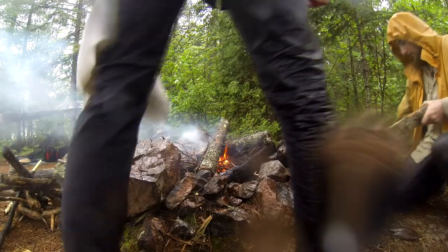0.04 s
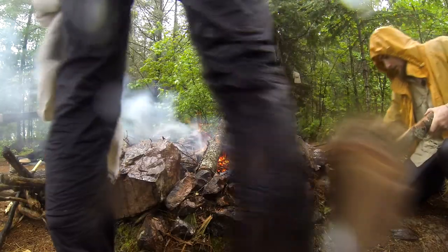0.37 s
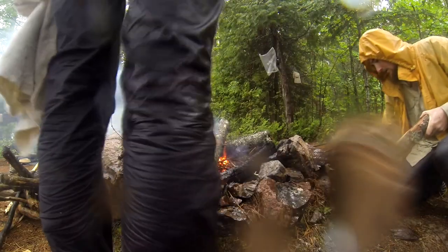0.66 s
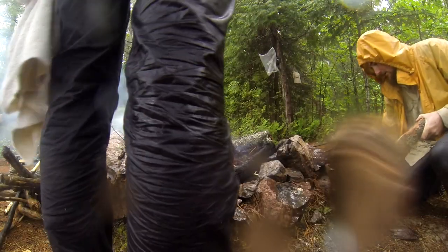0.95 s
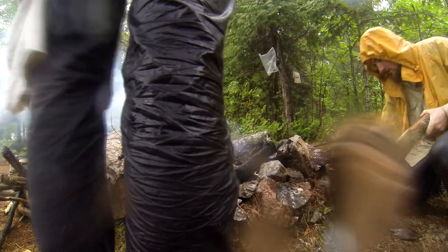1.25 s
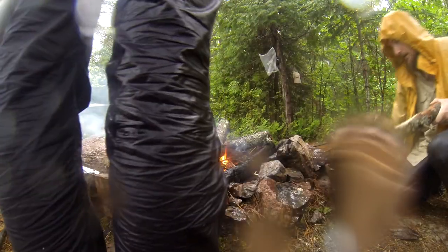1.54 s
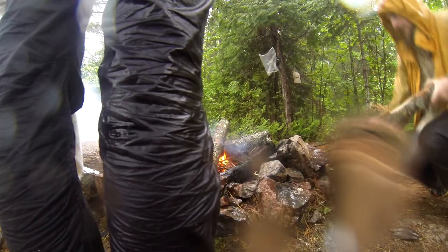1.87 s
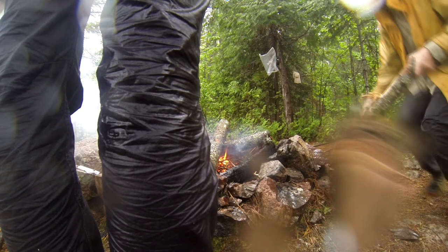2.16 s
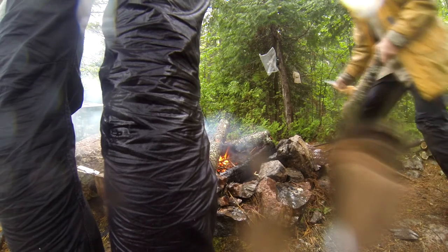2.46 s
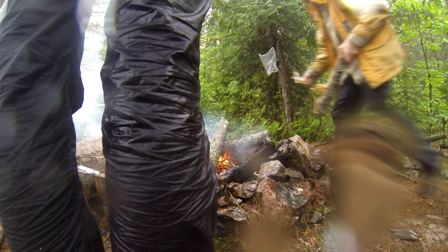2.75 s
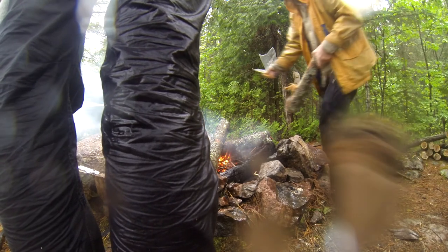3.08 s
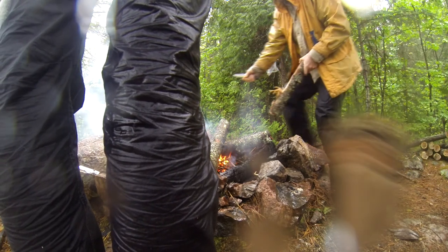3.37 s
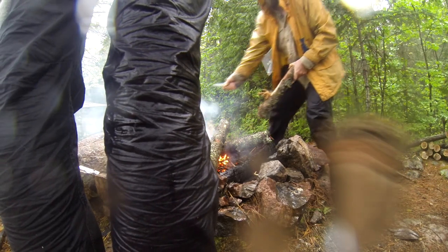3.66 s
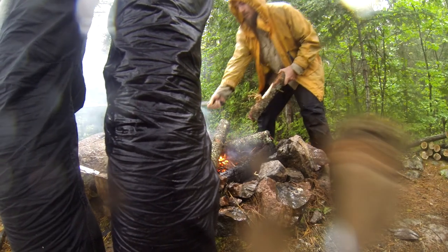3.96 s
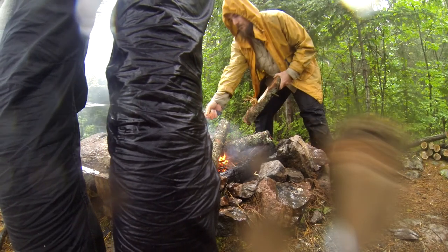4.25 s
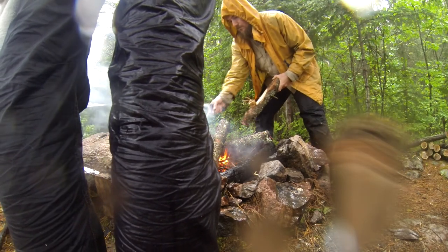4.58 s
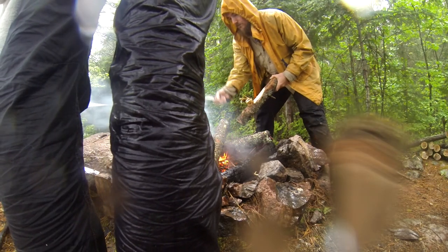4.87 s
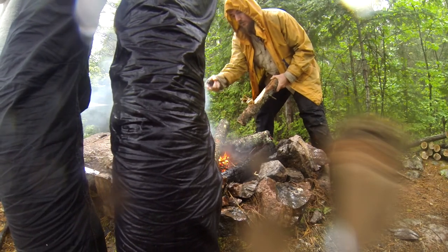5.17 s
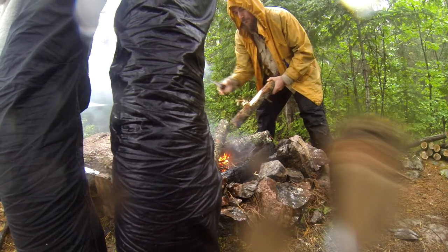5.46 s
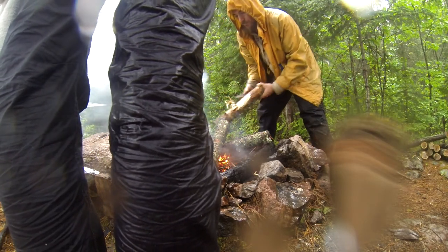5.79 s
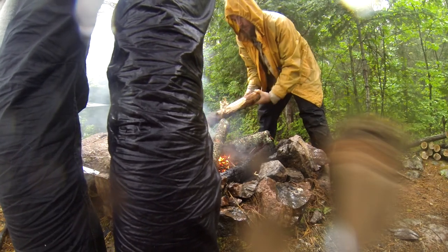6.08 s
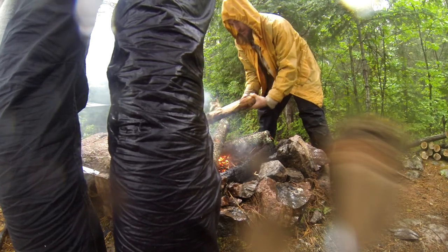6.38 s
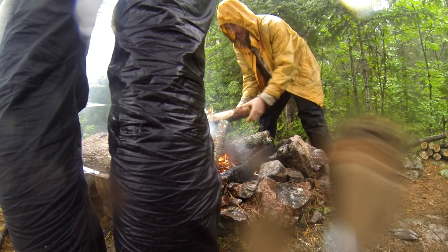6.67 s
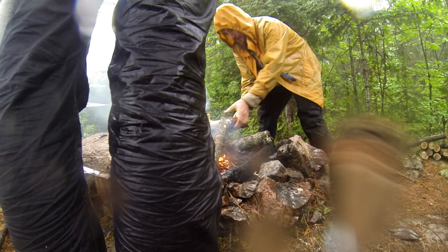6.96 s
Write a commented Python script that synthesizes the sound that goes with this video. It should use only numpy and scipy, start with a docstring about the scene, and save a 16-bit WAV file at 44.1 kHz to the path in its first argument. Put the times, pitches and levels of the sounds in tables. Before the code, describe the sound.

Single raindrops tick on a waterproof plastic camera housing at a forest campsite, heard by the microphone inside it. The taps are short and irregular, a few sharp and loud, many small, some with a tiny spit of spray. Dull knocks jolt the case, mostly in the first half. Later comes a quick run of lighter ticks. Behind them lie a faint, muffled rain hush and a barely audible electronic whine.

```python
"""Single raindrops tick on plastic, heard from inside a waterproof camera housing at a campsite.
Each impact excites the housing's damped modes in its own mix and bursts into a spit of spray.
Dull knocks jolt the case, and a nearby footfall and the heaviest drop set the mount swaying.
Behind them are faint droplets, a hush of rain muffled by the shell, and the thin whine of
the camera's electronics."""
import sys
import numpy as np
from scipy import signal
from scipy.fft import rfft, irfft, next_fast_len
from scipy.io import wavfile
from scipy.ndimage import map_coordinates

SR = 44100
rng = np.random.default_rng(int(sys.argv[2]) if len(sys.argv) > 2 else 0)


def waveform_to_disk(signal):
    """Save audio, clipped to [-1, 1], as 16-bit WAV at the path in sys.argv[1]."""
    frames = np.transpose(np.atleast_2d(signal))
    scaled = np.clip(frames, -1, 1) * 32767
    samples = np.round(scaled).astype(np.int16)
    wavfile.write(sys.argv[1], SR, samples)


N = 314433

# Normal modes, from the mount and the whole case on it up to the stiff rim:
# pitch_hz, relative_db, t60_s
MOUNT_MODES = [(99, -4.5, 0.025), (210, -8, 0.04)]
CASE_MODES = [(375, 0, 0.086)]
SHELL_MODES = [(1325, -0.5, 0.015), (1377, -5.5, 0.016), (1519, 1, 0.012), (1662, -4.5, 0.017)]
WALL_MODES = [(2080, -1, 0.013), (2420, -2.5, .012), (2807, -2, 0.013), (3050, -7, 0.015),
              (3283, -0.5, 0.013), (3550, 0.5, 0.0085), (3920, -0.5, 0.0096)]
RIM_MODES = [(4680, -5, 0.0079), (5186, -3.5, 0.0095), (5610, -9, 0.0093), (6560, -8.5, 0.0046),
             (6920, -7.5, 0.0029), (7500, -7.5, 0.004)]


def amp(db):
    """Decibels to amplitude ratio."""
    return 10 ** (np.asarray(db) / 20)


def add(track, start_s, x):
    """Superposition: x sums into the track from start_s on."""
    i = int(np.clip(round(start_s * SR), 0, N))
    track[i:i + len(x)] += x[:N - i]


def wobble(rate_hz):
    """Slow random modulation: a spline through rate_hz knots a second."""
    knots = rng.standard_normal(int(N * rate_hz / SR) + 4)
    return map_coordinates(knots, [np.arange(N) * rate_hz / SR])


def filtered(x, response):
    """Linear filtering: the spectrum of x times a frequency response."""
    size = next_fast_len(N + SR // 2)
    return irfft(rfft(x, size) * response(np.fft.rfftfreq(size, 1 / SR)), size)[:N]


def ring(modes, attack_s, centre_hz=None, reach_octaves=0.14, edge_ratio=0.53, order=4):
    """Modal superposition: a blow excites damped sines, favouring those near centre_hz. Energy 1."""
    t = np.arange(SR // 12) / SR
    hz, db, t60_s = np.transpose(modes)[:, :, None]
    scatter, detune = rng.standard_normal((2, len(modes), 1))
    db = db + 3.0 * scatter
    if centre_hz:
        db = db - 6 * np.abs(np.log2(hz / centre_hz)) / reach_octaves
    polarity = rng.choice([-1, 1], hz.shape)  # in or out, depending on the spot struck
    swing = polarity * np.sin(2 * np.pi * hz * (1 + 0.016 * detune) * t)
    # Wet plastic damps fast, leaving only a faint after-ring.
    decay = amp(-60 * t / t60_s) + amp(-42 - 60 * t / 0.068)
    onset = 1 - np.exp(-t / attack_s)
    x = np.sum(swing * amp(db) * decay, axis=0) * onset
    # Little is radiated below the modes that are struck.
    edge_hz = edge_ratio * (centre_hz or hz.min())
    x = signal.sosfilt(signal.butter(order, edge_hz, "high", fs=SR, output="sos"), x)
    return x / np.linalg.norm(x)


def splash(t60_s=0.0067, band_hz=(6500, 13500)):
    """Broadband transient: bursting water spits bright, fast-decaying noise. Energy 1."""
    t = np.arange(SR // 40) / SR
    burst = rng.standard_normal(len(t)) * amp(-60 * t / t60_s)
    x = signal.sosfilt(signal.butter(2, band_hz, "band", fs=SR, output="sos"), burst)
    return x / np.linalg.norm(x)


def electronics_whine():
    """Phase modulation: the thin, steady tones of the electronics waver slightly."""
    # Tones of the electronics: pitch_hz, rms_db
    tones = [(10645, -88), (13187, -96)]
    t = np.arange(N) / SR
    return sum(np.sqrt(2) * amp(db) * np.sin(2 * np.pi * hz * t + 0.5 * wobble(12)) for hz, db in tones)


def rain_hush(level_db=-59.0):
    """Transmission loss and resonance: the housing dulls and colours the noise of the rain outside."""
    # Spectral density of the hush inside: frequency_hz, relative_db
    spectrum = [(15, -2), (38, 1.5), (90, -5.5), (180, -10.5), (300, -14), (600, -18), (1080, -21.5),
                (1850, -18.5), (3400, -23), (4300, -26), (6200, -31.5), (9500, -36), (14500, -42)]
    # Resonances of the housing: centre_hz, half_width_hz, lift_db
    resonances = [(373, 31, 1.5), (1306, 122, 11.5), (1520, 158, 11.5), (2180, 58, 3), (3410, 300, 2.5),
                  (5220, 300, 2.5), (8100, 250, 4.5), (11200, 420, 7), (13100, 650, 6.5)]
    hz, db = np.transpose(spectrum)

    def transmission(f):
        slope = np.interp(np.log(f + 1), np.log(hz), db)
        lift = sum(lift_db * np.exp(-((f - centre) / width) ** 2)
                   for centre, width, lift_db in resonances)
        return amp(slope + lift)

    noise = filtered(rng.standard_normal(N), transmission)
    noise /= np.sqrt(np.mean(noise ** 2))
    return noise * amp(level_db + 0.61 * wobble(4.684))


def drizzle(count=48, weakest_db=-44, spread_db=5.5):
    """Random impact excitation: tiny droplets ring the housing, barely above the hush."""
    x = np.zeros(N)
    for when, size, spot in rng.random((count, 3)):
        shell = amp(7) * ring(SHELL_MODES, attack_s=0.00059)
        wall = ring(WALL_MODES, attack_s=0.0002, centre_hz=2400 + 1200 * spot)
        rim = amp(-6.5) * ring(RIM_MODES, attack_s=0.0001)
        add(x, when * N / SR, amp(weakest_db + spread_db * size) * (shell + wall + rim))
    return x


def mount_sway():
    """Damped free vibration: the mount rocks after a nearby footfall and after a heavy drop."""
    # Swings of the mount: start_s, pitch_hz, level_db, t60_s
    swings = [(0.564, 36.6, -52, 0.98), (1.778, 32.2, -45.5, 0.93)]
    x, t = np.zeros(N), np.arange(SR) / SR
    for start_s, pitch_hz, level_db, t60_s in swings:
        add(x, start_s, -amp(level_db - 60 * t / t60_s) * np.sin(2 * np.pi * pitch_hz * t))
    return x


def mount_knocks():
    """Structure-borne sound: a knock on the mount rings the whole case and hardly ticks."""
    # Dull knocks: start_s, strength_db, relative_thud_db
    knocks = [(.545, -34.5, 0), (0.889, -23, -10), (1.291, -30, -8), (1.6435, -25.5, -10),
              (2.413, -28.5, -12), (2.508, -12.5, -11), (2.6742, -24.5, -22), (3.1318, -28, 12),
              (3.1719, -25, -18), (3.3574, -33, -15), (4.512, -31, -8)]
    x = np.zeros(N)
    for start_s, strength_db, thud_db in knocks:
        case = ring(CASE_MODES, attack_s=0.0006)
        thud = amp(thud_db) * ring(MOUNT_MODES, attack_s=0.00043)
        shell = amp(-9) * ring(SHELL_MODES, attack_s=0.0001)
        wall = amp(-13) * ring(WALL_MODES, attack_s=0.00031)
        rim = amp(-21) * ring(RIM_MODES, attack_s=0.0001)
        add(x, start_s, amp(strength_db) * (case + thud + shell + wall + rim))
        add(x, start_s, amp(strength_db - 26) * splash())
    return x


def raindrops():
    """Impact excitation: each drop and the spot it strikes set how energy divides among the modes."""
    # Drops on the housing:
    # start_s, strength_db, stiffness_db, weight_db, snap_db, spray_db, shell_hz, wall_hz
    drops = [(0.2186, -8.5, 8, 4, -6.5, -21, 1556, 2840), (.258, -31.5, 5, 10, 3, -2, 1500, 2420),
             (0.4003, -36.5, -21, 0, -8, 0, 1410, 2850), (0.5185, -37.5, -7, 3, 8, 2, 1430, 3090),
             (.688, -43, 4, 4, 14, 3, 1450, 3100), (0.9248, 0.5, 1, -1, 10, -17, 1680, 2980),
             (0.9645, -33.5, 5, 5, 4, -2, 1590, 3560), (1.0958, -42, 8, -3, 16, 6, 1450, 3180),
             (1.6963, -17, 8, -2, 5.5, 0, 1450, 2950), (1.757, -34.5, 18, 8, 6, 0, 1480, 2880),
             (1.779, 7, -4.5, -1.5, 5.5, -3.5, 1420, 2450), (1.8679, -30.5, -8, 5, -1, 6, 1400, 2640),
             (1.8913, -29, -2, -9, 0.5, 9, 1400, 2720), (2.0669, -19, -9.5, -12, 5.5, -10, 1425, 2660),
             (2.1545, -41.5, 17, -5, -4, 6, 1480, 2850), (2.2089, -21, -2, 0, -4, -1, 1500, 3170),
             (2.415, -35, 0, 0, 8, 15, 1630, 2530), (2.4584, -43.5, 5, 8, 12, 14, 1450, 3120),
             (2.5125, -21.5, -4, -9, 6, 4, 1520, 2430), (2.5167, -19.5, -1.5, -13, 3, 4, 1500, 3520),
             (2.5607, -26, 0.5, 4.5, -2, 1, 1464, 3260), (2.6562, -31, 3.5, 0, 2, 15, 1420, 2920),
             (2.915, -39.5, -1, -7, 20.5, 7, 1360, 2860), (2.944, -31.5, -3, -7, 1, 7, 1640, 2290),
             (3.0357, -8, -5.5, -3, -1.5, 4, 1610, 2460), (3.1331, -1.5, -6, -8.5, -1, 7.5, 1400, 2900),
             (3.1534, -18, 5.5, -10, 0.5, 2, 1530, 2670), (3.69, -24, -12.5, 12.5, -8, 16, 1467, 2880),
             (4.3182, -3.5, -13, -4, -5.5, -5, 1450, 2580), (4.351, -29.5, -17, 3, -7, 0, 1440, 2180),
             (4.3683, -25, 2, -8, -8, -3, 1710, 2220), (4.563, -31.5, 3, 5, 3, -2, 1660, 2320),
             (4.773, -29, 8, 5, 1, -5, 1420, 2870), (4.958, -29, -6, 0, 7.5, 9.5, 1460, 2900),
             (5.1828, -26, 16, 0, 4, -2, 1600, 2900), (5.2476, -13, -10, -5, 1.5, -4, 1540, 2110),
             (5.316, -10.5, -1, 2.5, -8.5, 7, 1418, 2800), (5.4545, -15, 8.5, 0.5, -2, 7, 1750, 2840),
             (5.617, -34, -6, 7, -6, 0, 1460, 2730), (5.669, -33.5, -7, 9, 5, 8, 1400, 2680),
             (5.7457, -16.5, -6, 1, 7.5, -8, 1480, 2400), (5.77, -20, 7.5, 0.5, -9, 13, 1410, 3140),
             (5.784, -15, 5.5, -7, -5, 1, 1410, 2800), (5.915, -23.5, -2.5, 2.5, -12, 18, 1420, 2670),
             (6.2699, -31.5, -2.5, -11, 0, -2, 1420, 3350), (6.3656, -37, -20.5, 10.5, -8, 0, 1640, 2420),
             (6.545, -41, 3, 14, 11, 0, 1450, 3080), (6.9022, -23, -2, -2, -6, -2, 1520, 2520)]
    # Low modes of the flat panels: pitch_hz, relative_db, t60_s
    panel_modes = [(514, 0, 0.013), (716, 4.5, 0.029), (863, 6, 0.012)]
    x = np.zeros(N)
    for start_s, strength_db, stiffness_db, weight_db, snap_db, spray_db, shell_hz, wall_hz in drops:
        # A weighty drop shoves the whole case; soft spots thud more.
        shove_db = strength_db + weight_db - 14
        thud = amp(shove_db - 12.5 - 0.6 * stiffness_db) * ring(MOUNT_MODES, attack_s=0.0013)
        case = amp(shove_db) * ring(CASE_MODES, attack_s=0.00046)
        # The panels' flexing grows faster than the shove.
        panel = amp(1.63 * shove_db + 9) * ring(panel_modes, attack_s=0.000061)
        # A stiff spot rings the walls more than the shell.
        shell = amp(strength_db - stiffness_db / 2) * ring(
            SHELL_MODES, attack_s=0.00016, centre_hz=shell_hz, reach_octaves=0.11,
            edge_ratio=0.77, order=6)
        wall = amp(strength_db + stiffness_db / 2) * ring(
            WALL_MODES, attack_s=0.000065, centre_hz=wall_hz, reach_octaves=0.15, edge_ratio=0.52)
        # A snappy drop rings the rim and throws more spray.
        bright_db = strength_db + snap_db
        rim = amp(bright_db - 13.5) * ring(RIM_MODES, attack_s=0.0001)
        add(x, start_s, thud + case + panel + shell + wall + rim)
        add(x, start_s, amp(bright_db + spray_db - 28.5) * splash())
    return x


def scene():
    """Superposition: all sources sum at one microphone inside the housing."""
    impacts = raindrops() + mount_knocks() + drizzle()
    return (impacts + mount_sway() + rain_hush() + electronics_whine())[None]


def record(dry):
    """Band limiting: the camera cuts off steeply in the high treble."""
    cutoff_hz = 15000
    return filtered(dry[0], lambda hz: 1 / (1 + (hz / cutoff_hz) ** 80))[None]


dry = scene()
out = record(dry)
waveform_to_disk(out)
```